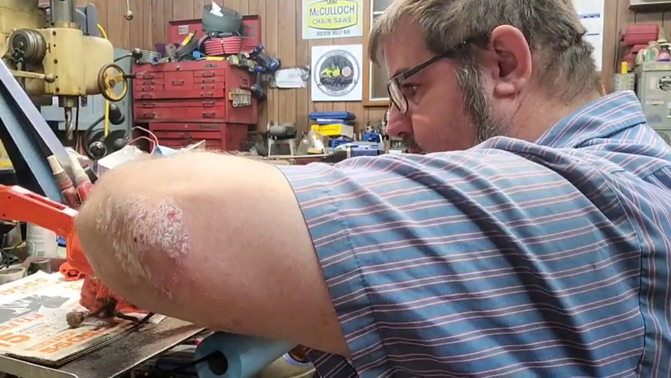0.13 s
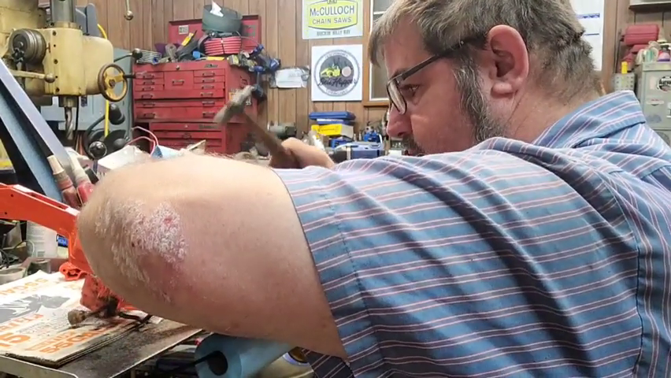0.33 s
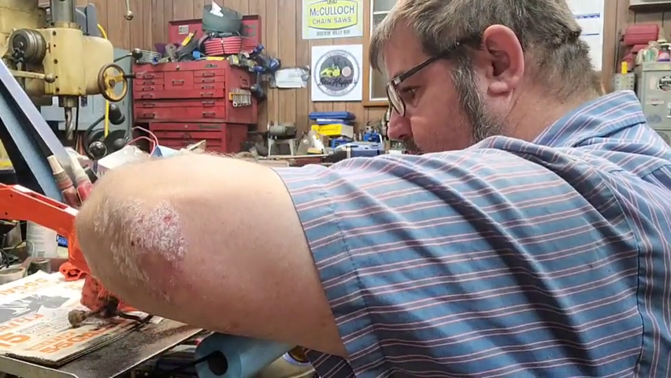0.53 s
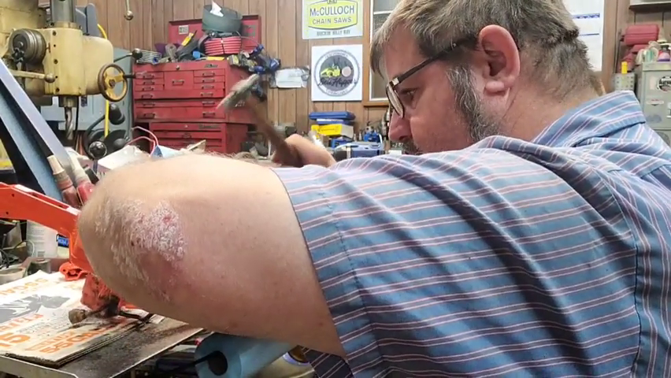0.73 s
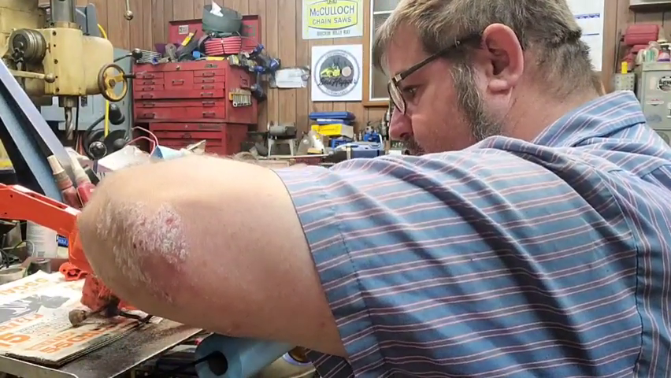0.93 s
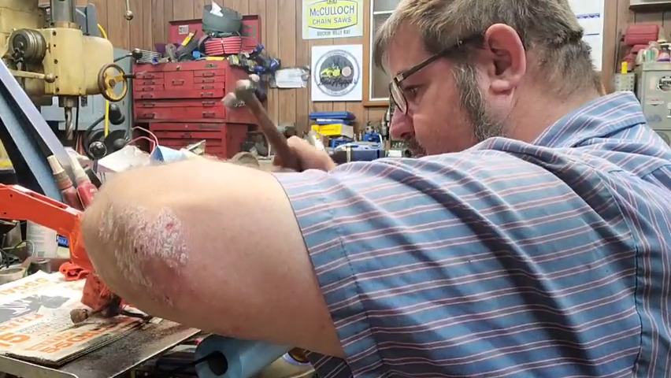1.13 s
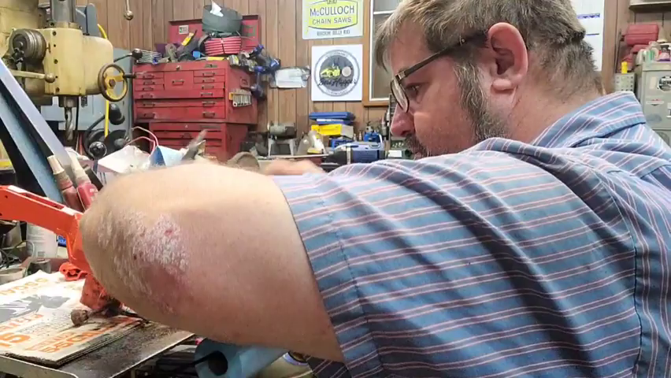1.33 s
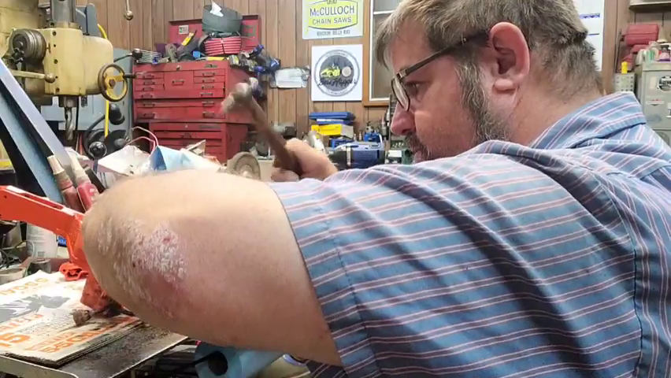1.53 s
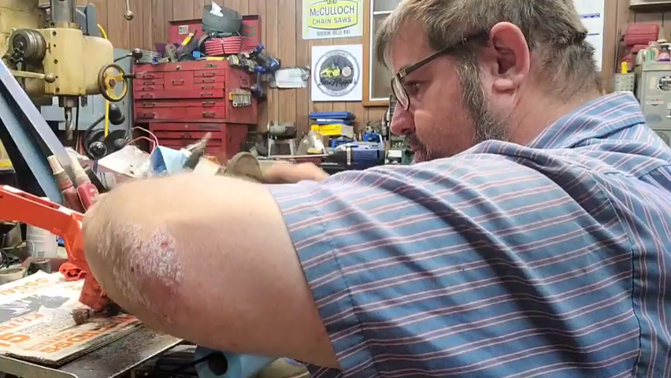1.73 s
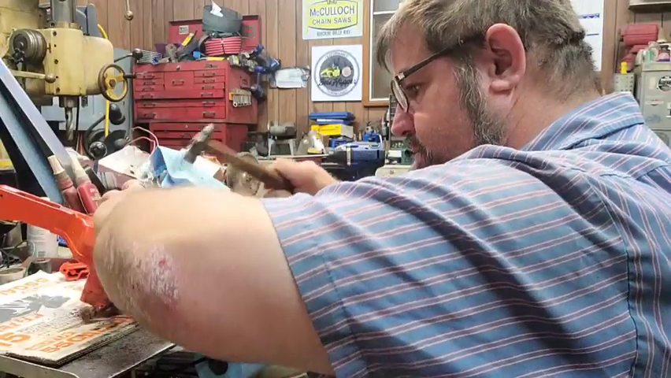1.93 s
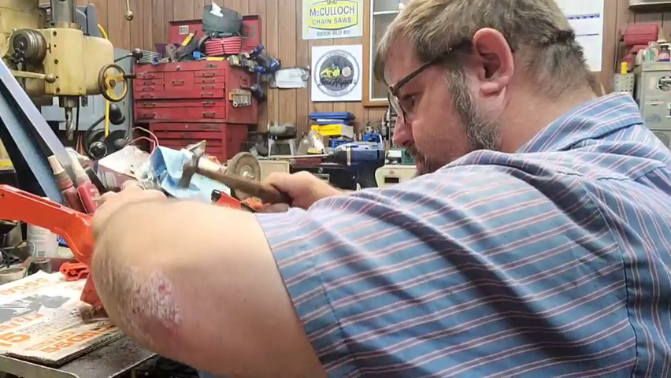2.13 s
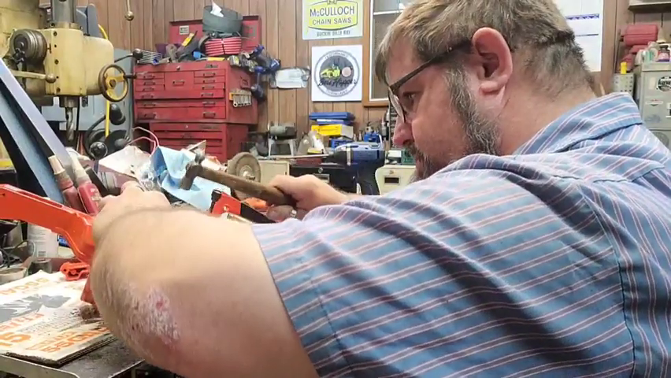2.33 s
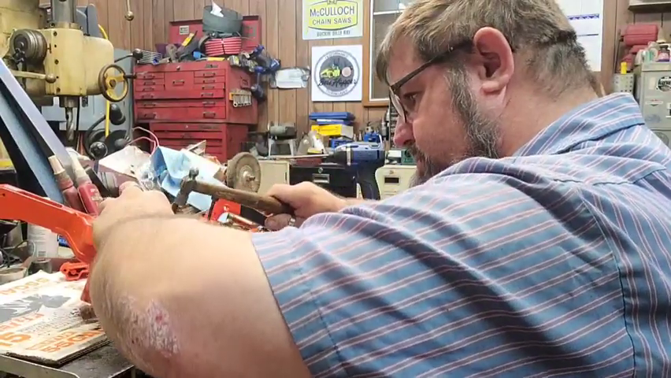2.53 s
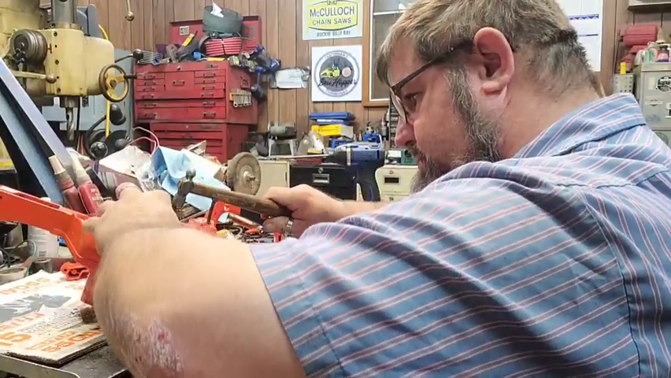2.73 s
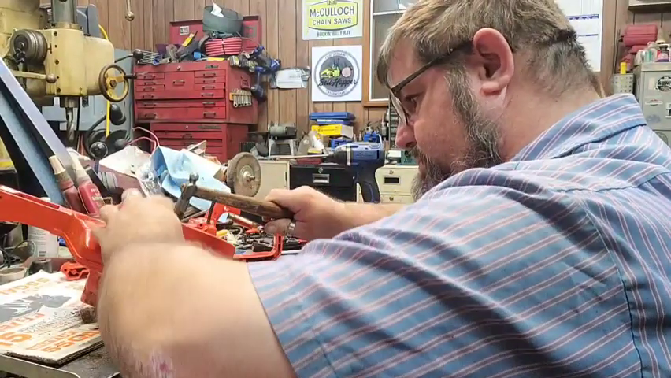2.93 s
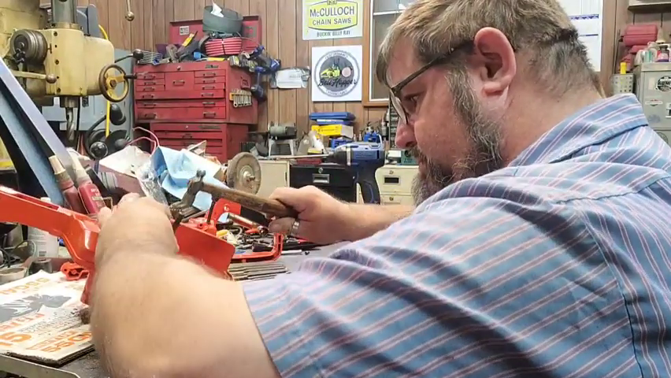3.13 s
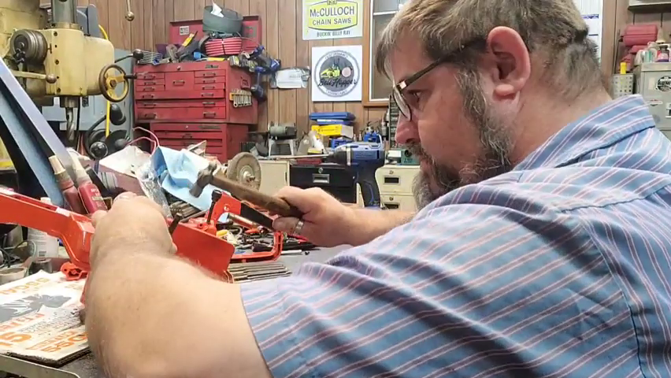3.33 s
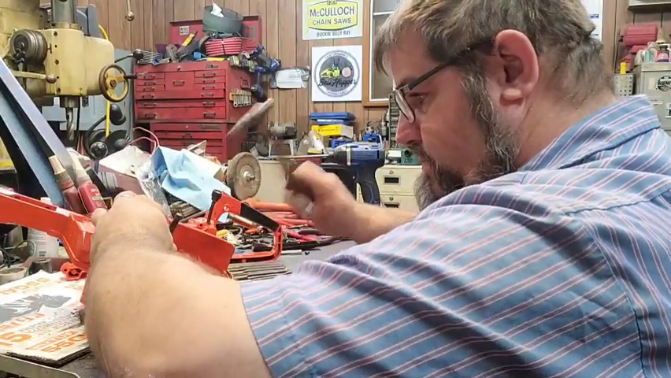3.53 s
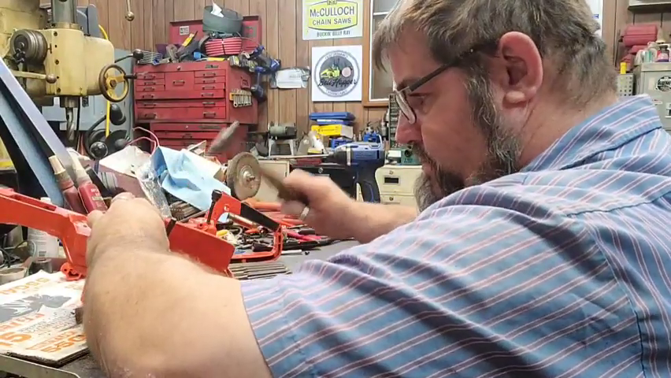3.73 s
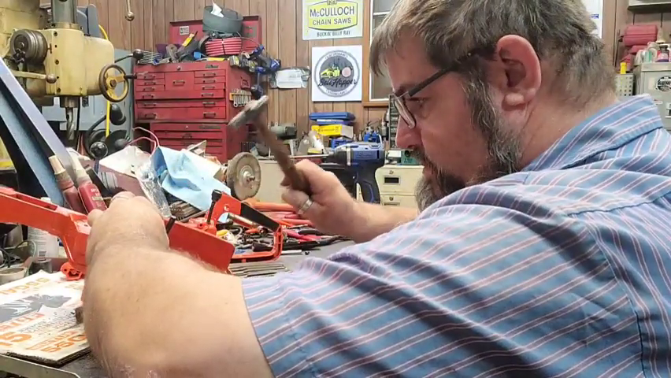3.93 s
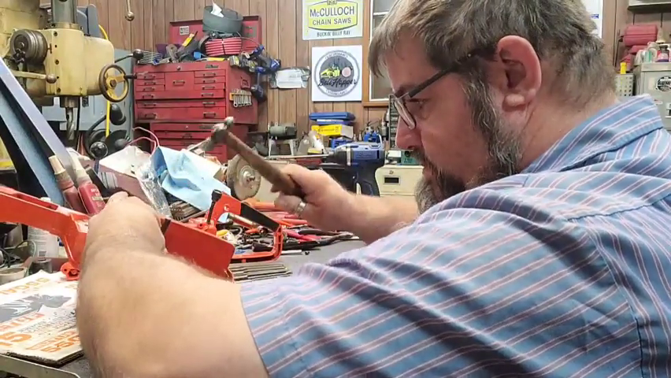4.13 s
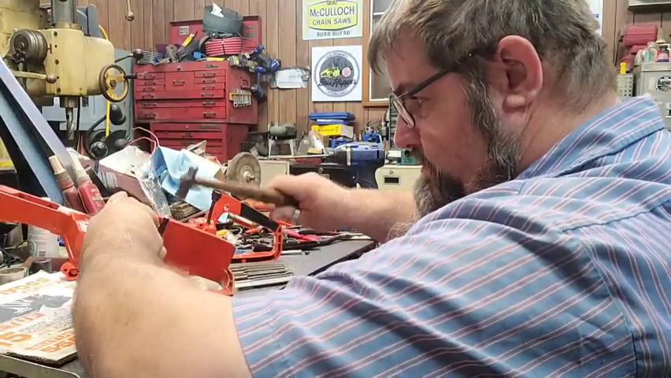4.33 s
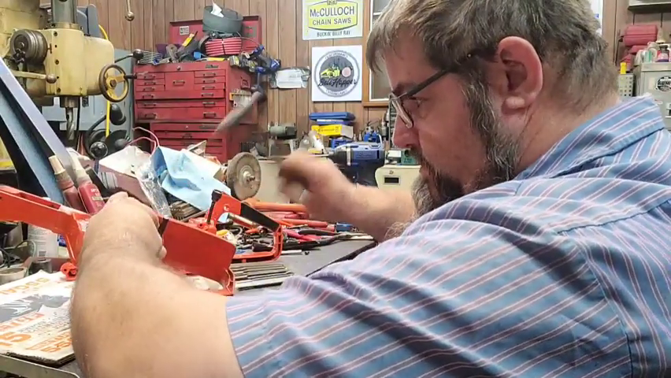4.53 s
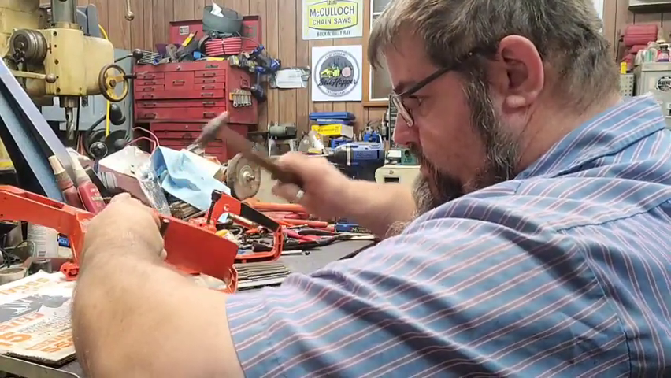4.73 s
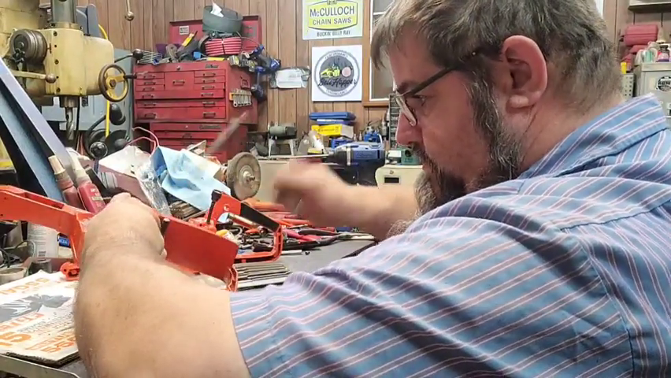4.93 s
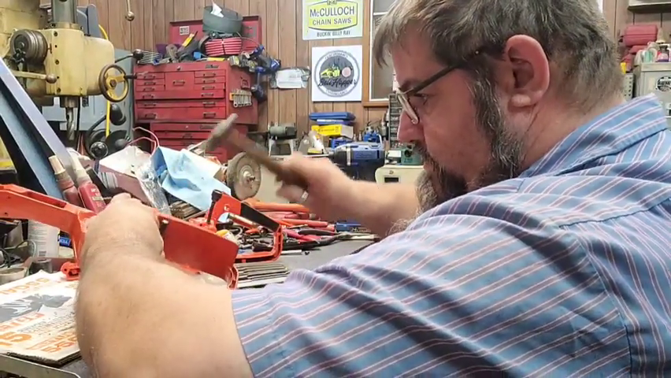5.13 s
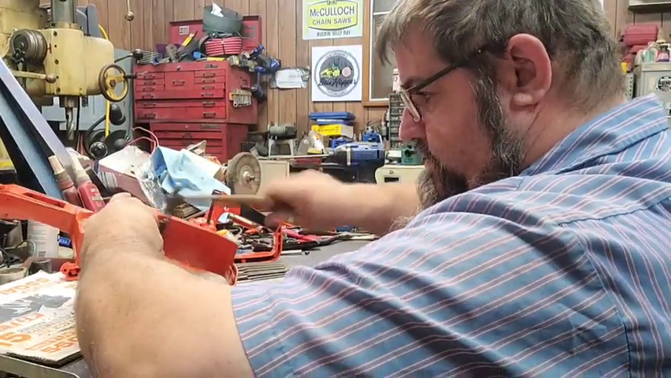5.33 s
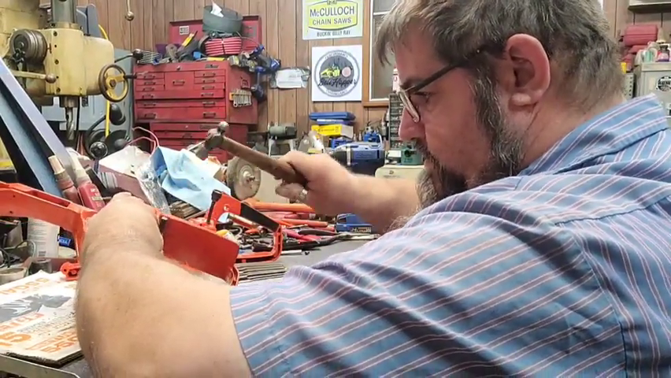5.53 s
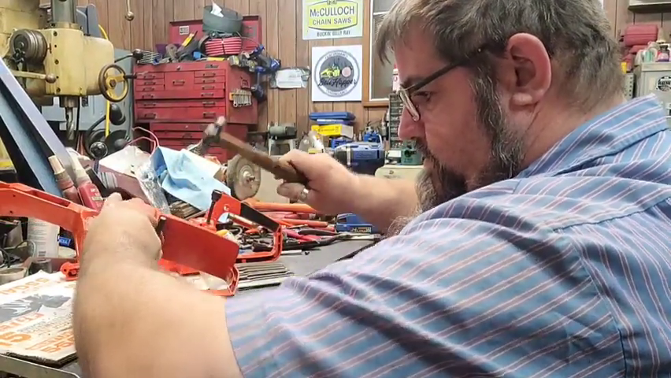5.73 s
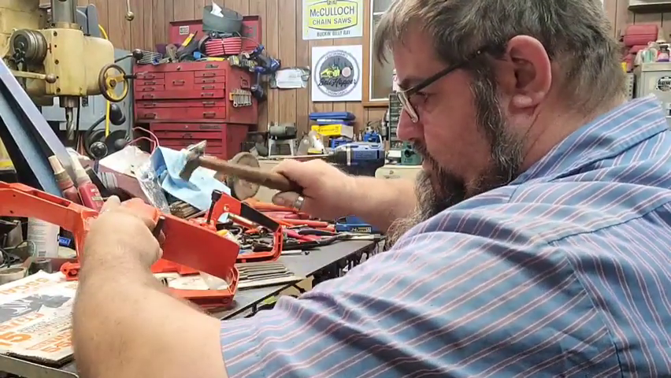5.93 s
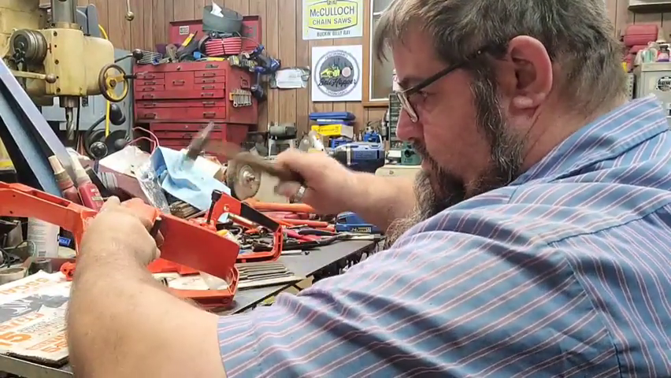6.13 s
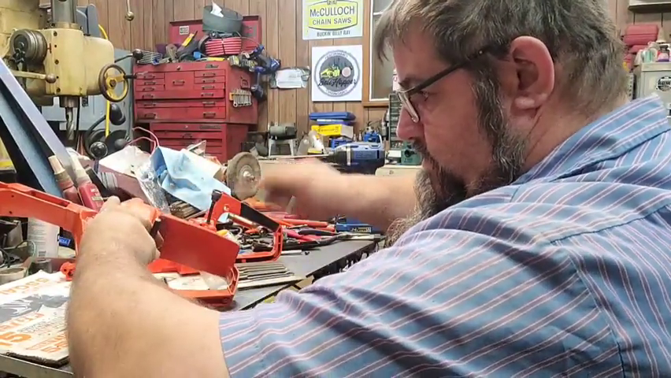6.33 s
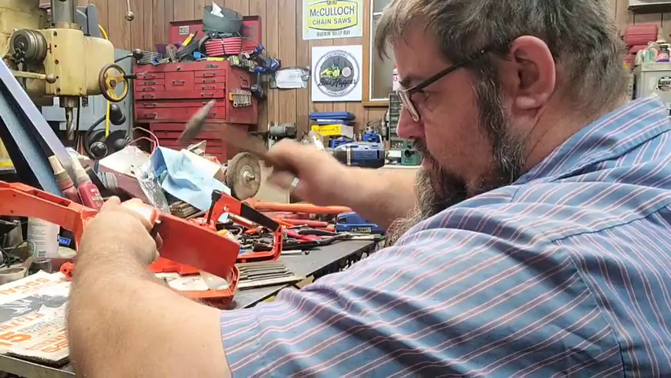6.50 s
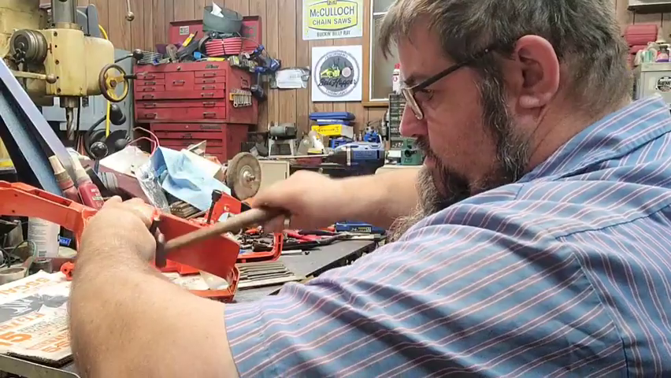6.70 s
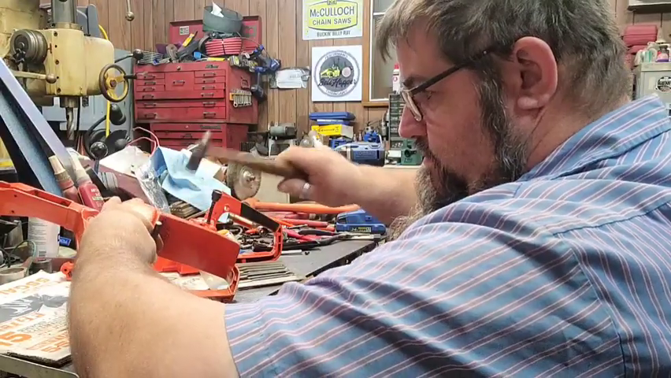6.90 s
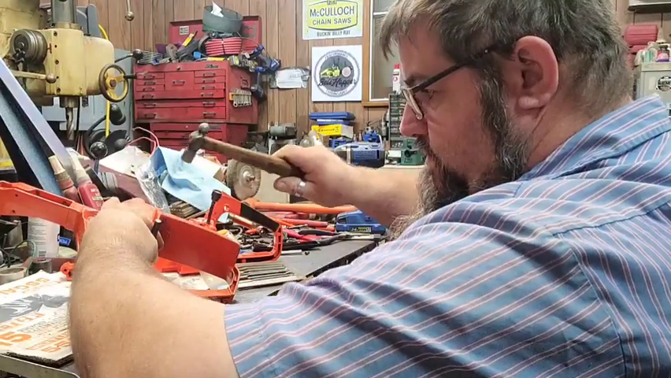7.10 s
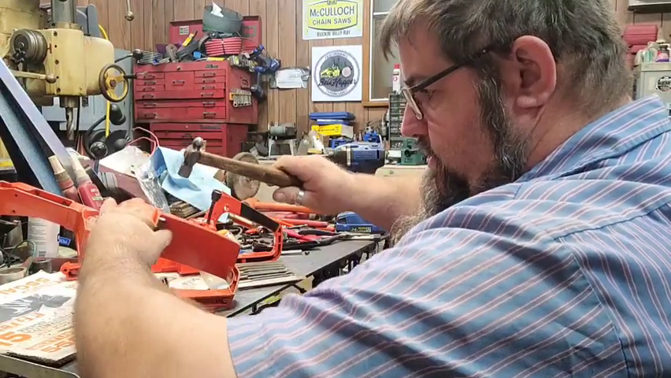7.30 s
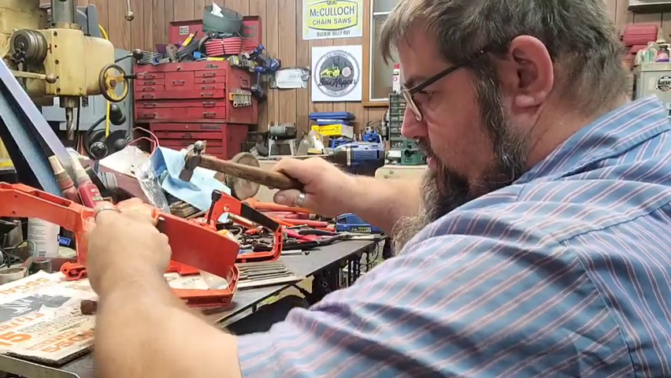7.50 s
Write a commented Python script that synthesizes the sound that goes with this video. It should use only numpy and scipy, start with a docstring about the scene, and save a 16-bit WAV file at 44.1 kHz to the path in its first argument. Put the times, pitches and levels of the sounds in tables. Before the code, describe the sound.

A small hammer strikes a steel punch five times between about 0.2 and 1.7 seconds, evenly spaced. Each blow is a sharp crack with a short metallic ring and a thud through the workbench. In the pause that follows, a plastic tool handle shifts with soft, hollow knocks, and one lighter tap lands at 2.5 seconds. A firm strike comes at 3.7 seconds, then three in a row from 4.7 to 5.4, with dull knocks between them. The last blow falls at 6.4 seconds. At 6.7 the pin gives way and the freed punch makes a quieter double clink; the pin lands with a tiny click and ping at 6.9. Faint knocks and finger ticks continue until about 7.6 seconds. Everything is heard close up in a small, lively workshop with a very faint electrical hum.

```python
"""A small hammer taps a steel punch, driving a pin out of a plastic tool handle on a workbench.
Each blow cracks, rings the steel and booms in the bench; the handle knocks as it shifts. At the end
the pin gives way, the freed punch clinks and the pin drops. A small, lively workshop with a faint
mains hum, heard in stereo through the two microphone ports of a phone close to the bench."""
import sys
import numpy as np
from scipy import signal
from scipy.fft import rfft, irfft
from scipy.io import wavfile

SR = 44100
rng = np.random.default_rng(int(sys.argv[2]) if len(sys.argv) > 2 else 0)


def store_wav(level_fs):
    """Save 16-bit WAV to argv[1]."""
    pcm = np.round(np.clip(np.atleast_2d(level_fs), -1, 1) * 32767)
    wavfile.write(sys.argv[1], SR, pcm.T.astype(np.int16))


N = 337894
EVENT_SAMPLES = 24576
AGE_S = np.arange(EVENT_SAMPLES) / SR
PORT_GAP_M, LEFT_LAG_S = .14, .00011


def undb(db):
    """Decibels to gain."""
    return 10 ** (np.asarray(db) / 20)


def unit(x):
    """Scale to unit energy, averaged over the channels."""
    return x / np.sqrt(np.mean(np.sum(x ** 2, axis=-1)))


def fade(t60):
    """Exponential decay that loses 60 dB in t60 seconds."""
    return np.exp(-np.log(1000) * AGE_S / t60)


def along(hz, points):
    """Read (freq_hz, value) points on a log-frequency axis."""
    freqs, values = np.transpose(points)
    return np.interp(np.log(np.maximum(hz, 1)), np.log(freqs), values)


def colour(x, points):
    """Minimum-phase filter through (freq_hz, gain_db) points."""
    n = x.shape[-1]
    gain = undb(along(np.fft.rfftfreq(n, 1 / SR), points))
    cepstrum = irfft(np.log(gain), n)
    cepstrum[1:n // 2] *= 2
    cepstrum[n // 2 + 1:] = 0
    return irfft(rfft(x) * np.exp(rfft(cepstrum)), n)


def diffuse(n):
    """Noise from all sides at the two ports: alike in the bass, unrelated in the treble."""
    alike = np.sinc(2 * np.fft.rfftfreq(n, 1 / SR) * PORT_GAP_M / 343)
    mid, side = rfft(rng.standard_normal((2, n))) * np.sqrt([1 + alike, 1 - alike])
    return irfft(np.array([mid + side, mid - side]), n)


def burst(t60, points):
    """Countless short-lived modes heard as one coloured crack."""
    spectrum = rfft(rng.standard_normal(EVENT_SAMPLES) * fade(t60))
    modes = irfft(spectrum / np.sqrt(np.abs(spectrum)))  # no mode stands far above the others
    return unit(colour(modes * fade(10 * t60), points))


def ring(modes, scatter_db, detune):
    """Decaying modes; grip and point of contact shift their strength and pitch a little."""
    out = 0
    for hz, db, t60 in modes:
        size, pitch, polarity = rng.standard_normal(3)
        wave = np.sign(polarity) * np.sin(2 * np.pi * hz * (1 + detune * pitch) * AGE_S)
        out = out + undb(db + scatter_db * size) * unit(wave * fade(t60))
    return out


# Reverberation of the small workshop: freq_hz, t60_s
ROOM_DECAY = [(100, 0.35), (400, 0.35), (1500, 0.34), (4500, 0.35), (8000, 0.31), (12000, 0.3),
              (16000, 0.097)]
# Reflections off surfaces near the phone: left_delay_s, right_delay_s, level_db
NEAR_ECHOES = [(.0013, .0019, -5), (.0075, .0062, -14), (.0155, .0225, -13)]

def workshop(sound, tail_db, build_s):
    """A sound at the bench reaches the phone directly, off near surfaces and as a dulling tail."""
    hz = np.fft.rfftfreq(EVENT_SAMPLES, 1 / SR)
    centres = np.transpose(ROOM_DECAY)[0]
    noise = rfft(diffuse(EVENT_SAMPLES))
    tail = 0
    for centre, t60 in ROOM_DECAY:
        band = along(hz, np.column_stack([centres, centres == centre]))
        tail = tail + irfft(noise * band) * fade(t60)
    paths = undb(tail_db) * unit(tail * (1 - np.exp(-AGE_S / build_s)))
    paths[0, round(LEFT_LAG_S * SR)] += 1  # the direct sound
    paths[1, 0] += 1
    for left_s, right_s, db in NEAR_ECHOES:
        paths[0, int(left_s * SR)] += undb(db)
        paths[1, int(right_s * SR)] += undb(db)
    wet = signal.fftconvolve(sound[None], paths, axes=1)[:, :EVENT_SAMPLES]
    return unit(wet) * np.sqrt(SR / 10)  # the energy of 0.1 s at rms 1


def add(track, start_s, sound):
    """Mix a stereo sound into the track from start_s."""
    start = round(start_s * SR)
    a, b = max(start, 0), min(start + EVENT_SAMPLES, N)
    track[:, a:b] += sound[:, a - start:b - start]


def blow_tone(light_db, square_db, bright_db):
    """A square blow rings the punch and booms in the bench; a light one loses boom and top."""
    boom_db = .64 * square_db + .85 * light_db
    sizzle_db = 1.1 * bright_db + .67 * light_db
    return [(600, boom_db), (1100, 0), (3300, 0), (3900, square_db), (4300, square_db),
            (5000, bright_db), (8500, bright_db), (11000, sizzle_db)]


# Blows close to the phone: start_s, level_db, squareness_db, brightness_db, left_minus_right_db
HAMMER_BLOWS = [(-0.21, -20, 2.5, -1, -0.5), (0.2406, -22.5, -2, -0.5, 0.5),
                (0.5864, -23, -0.5, 2.5, -1.25), (0.974, -22.5, 0.5, -1.24, 0), (1.3376, -24, 5.5, 0.5, 0),
                (1.6947, -23, 1, 1.5, 0.8), (2.547, -33, 1, -8, 1), (3.71, -21, -1.5, -1, -0.5),
                (4.7028, -22, -0.5, 0, 1), (5.0749, -22, 2, -1.5, -1), (5.447, -21, 2, -3, -0.5),
                (6.427, -22.5, 0.5, 0.2, -1)]
# Punch, hammer head and the bench under them: pitch_hz, energy_db, t60_s
STRUCK_MODES = [(126.5, -24, 0.058), (284, -26.5, 0.29), (421.8, -30, 0.14), (657, -25, 0.069),
                (1213, -15.5, 0.051), (1682, -23, 0.15), (2737, -18, 0.14), (2987, -20.5, 0.069),
                (3430, -22, .05), (3810, -14, .05), (4020, -9, .04), (4080, -7, .09), (4089, -31, .62),
                (4104, -29, .55), (4200, -12, .05), (4335, -14, .04), (4690, -12, .04), (5270, -16, .05),
                (5680, -14, .07), (6000, -20, .05), (7190, -20, .02), (7950, -19, .025),
                (8460, -18.5, 0.17), (15000, -13, 0.022), (15500, -11, 0.0088)]
# Spectrum of the contact crack: freq_hz, density_db
CRACK_SPECTRUM = [(30, -36.5), (70, -9.5), (130, -6), (200, -7), (300, -2), (450, -6.5), (650, -4.5),
                  (1050, -4), (1700, 4.5), (2400, -2.5), (4400, 2.5), (5800, 4), (6600, -0.5), (8300, 2.5),
                  (9400, -8.5), (15600, 6.5)]

def hammer_blows():
    """Steel on steel: a hard crack, the ring of the punch, a longer shudder of handle and bench."""
    out = np.zeros((2, N))
    firm_db = -22.5
    for start_s, db, square_db, bright_db, pan_db in HAMMER_BLOWS:
        force_db = db - firm_db
        light_db = min(force_db, 0)  # a tap lighter than firm rings the steel less
        reverb_db = .7 * force_db  # harder blows sound fuller and more reverberant, lighter taps drier
        crack = colour(burst(.0084, CRACK_SPECTRUM), [(200, -12), (1500, -5), (4000, 6.5), (15000, 5)])
        crack = undb(-.5) * workshop(crack, tail_db=-2.5 + reverb_db, build_s=.008)
        steel = ring(STRUCK_MODES, scatter_db=2.5, detune=.002)
        steel = undb(-3.2 + .29 * light_db) * workshop(steel, tail_db=.8 + reverb_db, build_s=.006)
        shudder = burst(.061, CRACK_SPECTRUM)
        shudder = colour(shudder, [(200, .5), (1500, -4), (4000, -5.5), (15000, -15)])
        shudder = undb(-9) * workshop(shudder, tail_db=16 + reverb_db, build_s=.0027)
        blow = colour(crack + steel + shudder, blow_tone(light_db, square_db, bright_db))
        port_gains = undb([[db + pan_db / 2], [db - pan_db / 2]])
        add(out, start_s, blow * port_gains)
    return out


# Still workshop air all round the phone: freq_hz, density_db
AIR_SPECTRUM = [(20, -20), (40, -9), (65, -6), (100, -10), (160, -15), (300, -19), (600, -25), (1000, -31),
                (4000, -36.5), (6500, -40), (9000, -51), (16000, -51)]
# Mains hum in the room: pitch_hz, rms_db
MAINS_HUM = [(59.6, -68.5), (119.3, -78), (240, -85)]

def room_tone(air_db, rumble_db):
    """Still air with a faint mains hum, and a low rumble that differs at each port."""
    air = unit(colour(diffuse(N), AIR_SPECTRUM)) * np.sqrt(N)
    rumble_spectrum = [(20, -15.5), (50, 3.5), (90, -4.5), (200, -17), (1000, -59.5)]
    rumble = unit(colour(rng.standard_normal((2, N)), rumble_spectrum)) * np.sqrt(N)
    t = np.arange(N) / SR
    hum = sum(np.sqrt(2) * undb(db) * np.sin(2 * np.pi * (hz * t + rng.random()))
              for hz, db in MAINS_HUM)
    return undb(air_db) * air + undb(rumble_db) * rumble + hum


# Handle and tools shifting on the bench: start_s, level_db, pitch_hz, hardness_db
HANDLE_KNOCKS = [(0.785, -62, 490, 10), (1.872, -53, 1400, -1), (2.109, -68.5, 463, -0.5),
                 (2.722, -57.5, 1600, -4), (2.894, -63.5, 1570, -6), (2.977, -46.5, 1570, 9.5),
                 (3.058, -61, 1550, -12), (3.122, -61.5, 1640, -4), (3.47, -68.5, 480, -2),
                 (3.598, -70.5, 522, -3), (4.81, -44, 1640, -2.5), (5.184, -42, 1780, -5),
                 (6.94, -62.5, 1640, -5.5), (7.261, -60, 1866, 4), (7.288, -59.5, 1685, 6.5),
                 (7.348, -64.5, 1950, 7), (7.387, -58.5, 2040, 0), (7.491, -59, 1450, -3.5),
                 (7.62, -61, 5530, -1)]
# The broad hump around a knock's pitch: pitch_ratio, density_db
KNOCK_SPECTRUM = [(.04, -28), (.17, -6), (0.402, -10), (0.702, -3), (1.1, 1.5), (1.6, -13.5), (3.2, -16),
                  (5.5, -39)]
# Treble lift from a hard contact: pitch_ratio, hardness_share
HARD_EDGE = [(1.1, 0), (1.8, 1)]

def handle_knocks():
    """Dead, hollow knocks of plastic and tools under the hand; softer contacts scuff on for longer."""
    out = np.zeros((2, N))
    for start_s, db, pitch_hz, hard_db in HANDLE_KNOCKS:
        body = [(pitch_hz * ratio, hump_db + hard_db * np.interp(ratio, *np.transpose(HARD_EDGE)))
                for ratio, hump_db in KNOCK_SPECTRUM]
        scuff = burst(.06 * 2 ** (-hard_db / 9), body)  # 9 dB softer lasts twice as long
        add(out, start_s, undb(db) * workshop(scuff, tail_db=.5, build_s=.0026))
    return out


# The punch jolting as the pin gives way: start_s, level_db, knock_db, crack_db
PUNCH_CLINKS = [(6.734, -37, -3, 2), (6.7432, -30.5, -6, 6)]
# The punch ringing free: pitch_hz, energy_db, t60_s
FREE_PUNCH_MODES = [(1620, -10, .07), (2845, -4, .045), (4125, -5, .07), (4750, -5, .04), (5610, -5, .04),
                    (6450, -8, .04), (11100, -14, .03), (15500, -7, .04)]

def punch_clinks():
    """The freed punch jumps against the handle and rings at its own pitches."""
    out = np.zeros((2, N))
    for start_s, db, knock_db, crack_db in PUNCH_CLINKS:
        knock = burst(.1, [(60, -17), (300, 3.5), (800, -3), (1600, 10), (3000, -8), (12000, -10.5)])
        crack = burst(.025, [(300, -14), (1500, -1), (3000, 1.5), (5500, 1), (9000, -8), (15000, -6)])
        steel = ring(FREE_PUNCH_MODES, scatter_db=1.5, detune=.001)
        clink = steel + undb(knock_db) * knock + undb(crack_db) * crack
        add(out, start_s, undb(db) * workshop(clink, tail_db=-5.5, build_s=.0013))
    return out


# The pin landing on the bench beside the phone: start_s, level_db
PIN_LANDING = [(6.8757, -41.5)]
# The pin and what it lands on: pitch_hz, energy_db, t60_s
LANDING_MODES = [(2840, -2, .035), (3080, -4, .02), (4100, -2, .03), (4450, -4, .02), (6850, -16, .03),
                 (7680, -21, .19), (15500, -15, .07)]

def pin_drop():
    """The pin lands with a click and a ping, so near that the room hardly answers."""
    out = np.zeros((2, N))
    for start_s, db in PIN_LANDING:
        click = burst(.006, [(300, -30), (1500, -16), (2800, 0), (4500, 0), (7000, -14), (15000, -28)])
        ping = ring(LANDING_MODES, scatter_db=1, detune=.001) + undb(1.5) * click
        add(out, start_s, undb(db) * workshop(ping, tail_db=-15, build_s=.0038))
    return out


# Ticks right by the microphones: start_s, level_db
FINGER_TICKS = [(7.5075, -57), (7.571, -66)]

def finger_ticks():
    """Small things tick under the fingers, short and dry."""
    out = np.zeros((2, N))
    for start_s, db in FINGER_TICKS:
        tick = burst(.0026, [(60, 16), (400, 7.5), (1500, -7), (4000, 0), (7000, -36), (15000, -34)])
        add(out, start_s, undb(db) * workshop(tick, tail_db=-16, build_s=.006))
    return out


def scene():
    """All the work at the bench over the room tone."""
    work = hammer_blows() + handle_knocks() + punch_clinks() + pin_drop() + finger_ticks()
    return work + room_tone(air_db=-73, rumble_db=-73)


def record(dry):
    """The left port is the brighter one; the phone rounds the peaks and cuts deep bass and the top."""
    left = colour(dry[0], [(100, 0), (400, -.6), (4500, -.4), (8000, 1.5), (13000, 2.5)])
    right = colour(dry[1], [(100, 0), (400, 1), (4500, 1), (8000, -1.2), (13000, -3)])
    rounded = .9 * np.tanh(np.array([left, right]) / .9)
    bass_cut = signal.butter(2, 45, "high", fs=SR, output="sos")
    top_cut = signal.ellip(10, .2, 65, 15900, fs=SR, output="sos")
    return signal.sosfilt(top_cut, signal.sosfilt(bass_cut, rounded))


dry = scene()
out = record(dry)
store_wav(out)
```